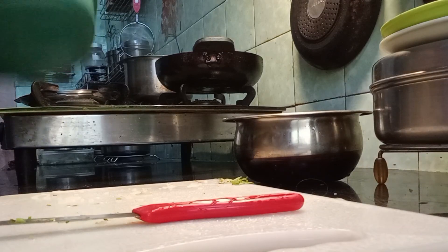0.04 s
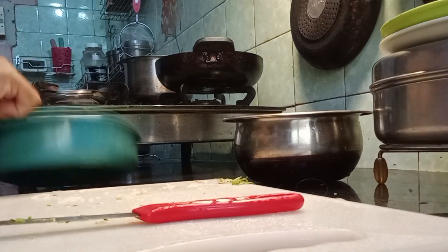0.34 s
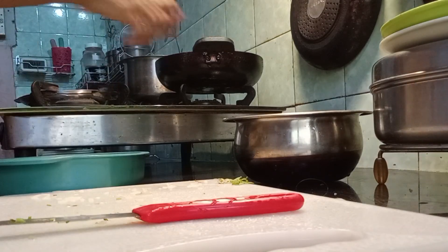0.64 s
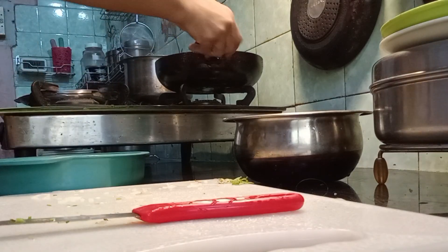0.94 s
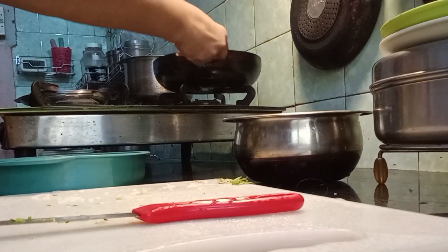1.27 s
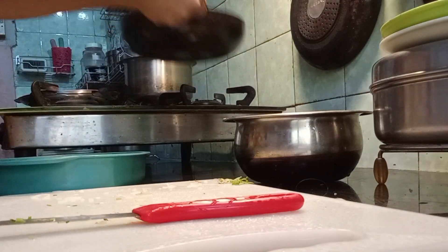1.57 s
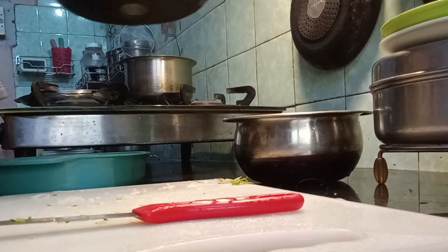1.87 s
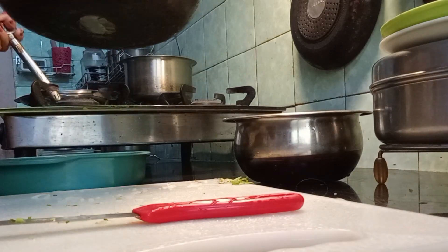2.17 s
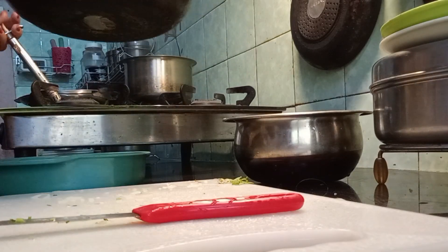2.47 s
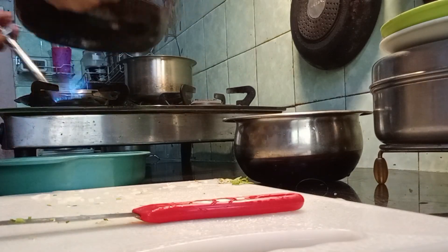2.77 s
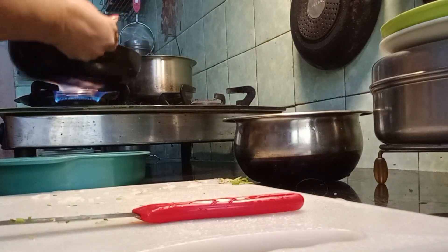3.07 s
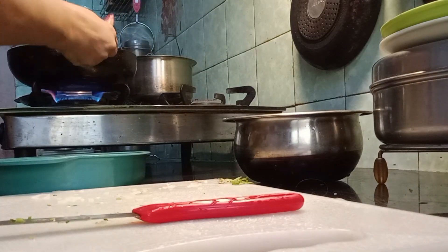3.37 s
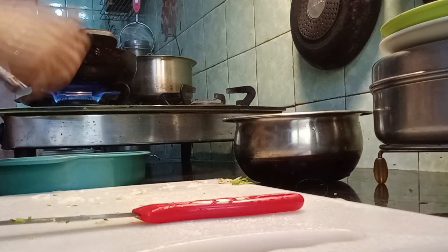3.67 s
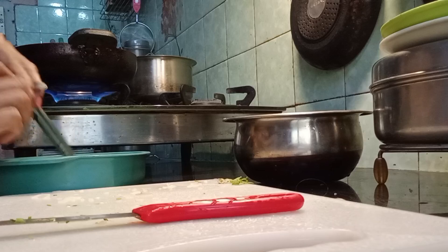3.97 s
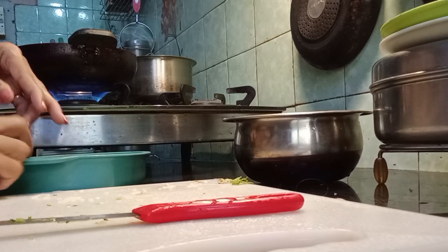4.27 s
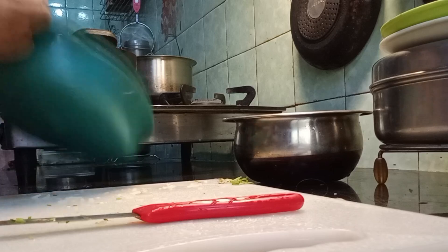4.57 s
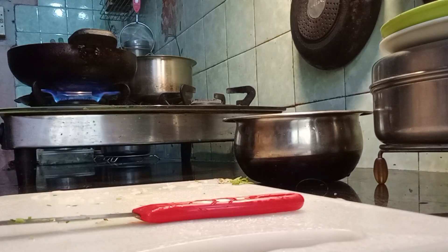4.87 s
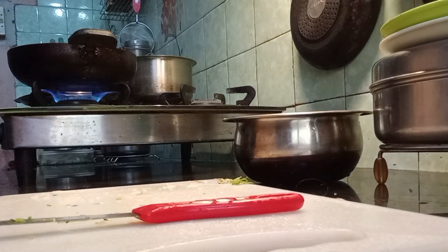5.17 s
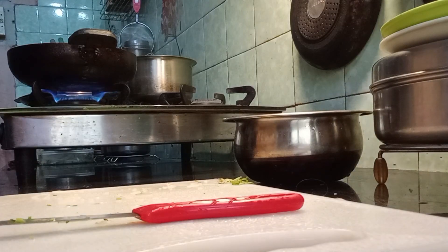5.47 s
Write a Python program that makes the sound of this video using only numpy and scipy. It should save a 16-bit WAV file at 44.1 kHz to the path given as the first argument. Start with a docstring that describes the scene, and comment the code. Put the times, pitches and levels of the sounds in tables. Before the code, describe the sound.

A hollow plastic basin knocks and slides on a stone counter, followed by a faint clink of a lifted pan. A gas knob clicks, a lighter snaps and the burner softly catches before the pan clanks onto the grate. A steel utensil drops noisily into the basin, which stutters away, and a cutting board is shoved. The microphone sits close on the worktop of a quiet tiled kitchen, picking up soft handling swishes.

```python
"""A small tiled kitchen, heard from the worktop. A plastic basin lands, slides and rocks on the stone.
A pan scrapes and clinks off the stove. The knob clicks, gas rushes out, a lighter snaps and the flame
catches with a soft whump; the pan knocks and squeals back onto the grate. A steel utensil clatters into
the basin, the basin is dragged away, and a board judders across the worktop close by. Each knock is a
thud, a ringing body and a tick; the moves swish and rumble over a quiet room tone."""
import sys
import numpy as np
from scipy import signal
from scipy.fft import rfft, irfft
from scipy.io import wavfile
from scipy.ndimage import uniform_filter1d

SR = 44100
rng = np.random.default_rng(int(sys.argv[2]) if len(sys.argv) > 2 else 0)


def wav_record(signal):
    """Record a signal, one row per channel, as 16-bit PCM in the file named by sys.argv[1]."""
    frames = np.transpose(np.atleast_2d(signal))
    bounded = np.clip(frames, -1, 1)
    # unit amplitude maps onto the largest positive 16-bit level
    quanta = np.round(bounded * 32767).astype(np.int16)
    wavfile.write(sys.argv[1], SR, quanta)


N = 252693

# Bright tick of a hard contact: f/Hz, level/dB
TICK_COLOUR = [(2710, -49), (4600, -17), (4670, -22), (5020, -11.5), (6110, -9), (6700, -0.5), (7090, 0),
               (8730, -5.5), (9230, -13), (10500, -0.5), (11500, -10), (12600, -6.5), (13800, -8.5),
               (14900, -10.5), (15500, -13)]
# Faint high hiss, peaking near 8 and 10 kHz: f/Hz, level/dB
HIGH_HISS_COLOUR = [(6000, -11), (7300, -5.5), (7800, 2), (8500, -7), (9300, -24), (10000, -1.5),
                    (10500, -4.5), (11200, -19.5)]
# Moves of an arm or a thing carried: t/s of top speed, half length/s, rumble level/dB, swish level/dB
ARM_MOVES = [(0.016, 0.031, -65, -41.5), (0.158, 0.05, -53, -41.5), (0.445, 0.11, -47.5, -43.5),
             (1, 0.089, -58.5, -75), (1.24, 0.051, -44.5, -65), (1.5, 0.18, -62, -71.5),
             (1.689, 0.024, -75, -48.5), (2.846, 0.042, -54, -75), (2.925, 0.054, -58, -61.5),
             (3.243, 0.07, -54, -51.5), (3.685, 0.052, -51.5, -64.5), (3.931, 0.098, -49, -58.5),
             (4.36, 0.067, -49, -58), (4.696, 0.062, -51, -50.5), (5.246, 0.094, -66, -66.5)]


def gain_of(db):
    """Decibels to amplitude."""
    return 10 ** (np.asarray(db) / 20)


def unit_rms(x):
    """Scales to rms 1."""
    return x / np.sqrt(np.mean(x ** 2) + 1e-20)


def unit_onset(x, size=1100):
    """Scales a sound so that its attack has rms 1."""
    return x / np.sqrt(np.mean(x[:size] ** 2) + 1e-20)


def curve_at(points, hz):
    """Reads a curve on a log-frequency axis."""
    f, value = np.transpose(points)
    return np.interp(np.log(hz + 1), np.log(f + 1), value)


def add(mix, s, sound):
    """Mixes a sound in at time s."""
    part = mix[max(round(s * SR), 0):][:len(sound)]
    part += sound[:len(part)]


def coloured(x, spectrum, size=4096):
    """Minimum-phase EQ that rolls off steeply beyond the ends of its spectrum."""
    hz = abs(np.fft.fftfreq(size, 1 / SR)) + 1
    octaves_outside = abs(np.log2(hz / np.clip(hz, spectrum[0][0], spectrum[-1][0])))
    log_gain = np.log(gain_of(np.maximum(curve_at(spectrum, hz) - 60 * octaves_outside, -100)))
    taps = np.fft.ifft(np.exp(np.conj(signal.hilbert(log_gain)))).real
    return signal.fftconvolve(x, taps[:size // 2])[:len(x)]


def drift(rate_hz):
    """Random modulation of rms 1, no faster than rate_hz."""
    slow = np.fft.rfftfreq(N, 1 / SR) < rate_hz
    return unit_rms(irfft(rfft(rng.standard_normal(N)) * slow, N))


def surge(crest_s, attack_s, release_s):
    """An envelope that swells to 1 at its crest and dies away."""
    t = np.arange(N) / SR - crest_s
    return np.exp(np.minimum(t / attack_s, -t / release_s))


def strokes(rows, attack_s=0.004, release_s=0.01):
    """The envelope of rubbing strokes: each builds up, holds to the end of its length and dies away."""
    t = np.arange(N) / SR
    return sum(gain_of(db) * np.clip((t - s) / attack_s, 0, 1)
               * np.exp(-np.maximum(t - s - length, 0) / release_s) for s, length, db in rows)


def swell(s, half_length_s):
    """A bell-shaped envelope, 1 at time s, like the speed of a smooth move."""
    return np.exp(-((np.arange(N) / SR - s) / half_length_s) ** 2 / 2)


def hiss(spectrum, grain_db, rate_hz, patchy_db):
    """Coloured noise whose level flutters and whose colour shifts in patches."""
    fluttering = rng.standard_normal(N) * gain_of(grain_db * drift(rate_hz))
    bands = signal.stft(fluttering, nperseg=1024, noverlap=768)[2]
    patches = uniform_filter1d(rng.standard_normal(bands.shape), size=4, axis=0)
    patches = unit_rms(uniform_filter1d(patches, size=14, axis=1))
    noise = signal.istft(bands * gain_of(patchy_db * patches), nperseg=1024, noverlap=768)[1][:N]
    return unit_rms(coloured(noise, spectrum))


def squeal(skids, pitch_hz, waver):
    """Stick and slip locks onto one unsteady pitch for as long as a skid lasts."""
    hz = pitch_hz * (1 + waver * drift(rate_hz=58))
    return np.sqrt(2) * strokes(skids) * np.sin(2 * np.pi * np.cumsum(hz) / SR)


def crack_and_tail(t, crack_db, damping, crack_s, late_db=-38, late_t60=0.31):
    """A short crack, then dense ringing and reflections off the tiles, each band at its own decay."""
    # Decay of the dense ringing before damping: f/Hz, t60/s
    ring_time = [(150, 0.32), (500, 0.21), (1400, 0.22), (3500, .18), (9000, 0.23), (15000, 0.11)]
    hz, s, bands = signal.stft(rng.standard_normal(len(t)), SR, nperseg=256)
    uneven = np.exp(.17 * rng.standard_normal((len(hz), 1)))
    ringing = gain_of(-60 * s * damping * uneven / curve_at(ring_time, hz)[:, None])
    reflections = gain_of(late_db - 60 * s / late_t60)
    tail = signal.istft(bands * (ringing + reflections) / uneven, SR, nperseg=256)[1][:len(t)]
    crack = rng.choice([-1., 1.], len(t)) * np.exp(-(t / crack_s) ** 3)
    crack[0] = 8  # the first contact stands above the chatter that follows
    return unit_rms(tail) + gain_of(crack_db) * unit_rms(crack)


def ring(t, modes, spot_db=1.0):
    """Decaying modes; their balance varies at random, as with the spot that is struck."""
    hz, db, t60 = np.transpose(modes)[:, :, None]
    share = gain_of(db + spot_db * rng.standard_normal(hz.shape)) * rng.choice([-1, 1], hz.shape)
    return (share * gain_of(-60 * t / t60) * np.sin(2 * np.pi * hz * t)).sum(0)


def struck(blows, modes, wash, tick_spectrum, level_db, modes_db, damping,
           rise_s=.0001, dulling=0.12, crack_s=0.003):
    """Each blow: a thud from its weight, clear modes over a wash of dense ones, and a contact tick.
    A blow's thud and tick are set against the body, its crack against the tail."""
    t, out = np.arange(SR // 2) / SR, np.zeros(N)
    split_hz, hard_tick_db = 470, -18
    lows = signal.butter(4, [85, split_hz], "band", fs=SR, output="sos")
    highs = signal.butter(4, split_hz, "high", fs=SR, output="sos")
    rise = 1 - np.exp(-(t + 1 / SR) / rise_s)  # glancing contacts build up slowly
    for s, db, thud_db, tick_db, crack_db in blows:
        dense = unit_onset(coloured(rise * crack_and_tail(t, crack_db, damping, crack_s), wash))
        ring_share = 1 / np.hypot(1, gain_of(crack_db))  # a sharp blow spends itself in the crack
        resonance = dense + ring_share * gain_of(modes_db) * unit_onset(rise * ring(t, modes))
        thud = gain_of(thud_db) * unit_onset(signal.sosfilt(lows, resonance))
        body = unit_onset(signal.sosfilt(highs, resonance))
        tilt_db = dulling * min(tick_db - hard_tick_db, 0)  # per octave: a weak tick is also a dull one
        colour = [(hz, level + tilt_db * np.log2(hz / tick_spectrum[0][0])) for hz, level in tick_spectrum]
        contact = rise * crack_and_tail(t, crack_db, damping, crack_s)
        tick = gain_of(tick_db) * unit_onset(coloured(contact, colour))
        add(out, s, gain_of(db + level_db) * (body + thud + tick))
    return out


def room_tone(whine_hz=1075, whine_db=-75):
    """A quiet bed of air with a thin, wavering whine."""
    # Colour of the still room: f/Hz, level/dB
    air_colour = [(30, -36), (100, -12.5), (180, -23.5), (260, -16.5), (400, -23), (850, -21.5),
                  (1070, -18.5), (1250, -25), (2000, -28.5), (2600, -35.5), (3700, -41), (4400, -51),
                  (16000, -51.5)]
    air = gain_of(-70.5) * hiss(air_colour, grain_db=1.7, rate_hz=6.1, patchy_db=4.5)
    hz = whine_hz * (1 + 0.0055 * drift(rate_hz=30))
    whine = gain_of(whine_db + 3.4 * drift(rate_hz=4.4)) * np.sin(2 * np.pi * np.cumsum(hz) / SR)
    return air + whine


def rumble(still_db=-75):
    """A low flutter that follows each move, with a few rounder puffs."""
    # Low end of handling and flame: f/Hz, level/dB
    rumble_colour = [(25, -25.5), (48, -17), (62, -9), (76, -17), (100, 9), (122, -8.5), (145, -2.5),
                     (185, -23), (300, -21)]
    # Soft puffs of flame and handling: t/s of the crest, level/dB, f/Hz, half length/s
    low_puffs = [(2.096, -41.5, 110.5, 0.012), (2.516, -38.5, 149, 0.055), (2.9, -49, 173.7, 0.012),
                 (2.97, -41.5, 126, 0.021), (3.164, -39.5, 129.6, 0.036), (3.934, -38.5, 140, 0.06)]
    wavering_t = np.cumsum(1 + 0.069 * drift(rate_hz=43)) / SR
    puffs = sum(gain_of(db) * swell(s, length) * np.sin(2 * np.pi * hz * wavering_t)
                for s, db, hz, length in low_puffs)
    motion = gain_of(still_db) + sum(gain_of(db) * swell(s, length) for s, length, db, _ in ARM_MOVES)
    return puffs + motion * hiss(rumble_colour, grain_db=3.0, rate_hz=14, patchy_db=-1.5)


def handling():
    """The hollow swish of things being moved, and the rustle of fingers."""
    # Colour of the swish: f/Hz, level/dB
    swish_colour = [(200, -13.5), (380, -3.5), (540, 3.5), (720, -6), (850, 1), (1080, -1.5), (1300, -19),
                    (1650, -15.5), (2000, -15), (2300, -31.5), (3800, -43.5), (5000, -58)]
    # Fingers rub on the basin and the pan's handle: t/s, length/s, level/dB
    finger_rubs = [(0.0, 0.025, -78.5), (0.97, 0.067, -80.5), (1.245, 0.036, -77.5), (3.84, 0.18, -85)]
    motion = sum(gain_of(db) * swell(s, length) for s, length, _, db in ARM_MOVES)
    swish = gain_of(-2) * motion * hiss(swish_colour, grain_db=1.5, rate_hz=46, patchy_db=3.5)
    rubbing = gain_of(-95) + strokes(finger_rubs, attack_s=0.013, release_s=0.04)
    return swish + rubbing * hiss(HIGH_HISS_COLOUR, grain_db=2.5, rate_hz=8.3, patchy_db=4.0)


def knob_and_lighter(spring_db=-48, spring_release_s=0.027):
    """The gas knob clicks round; the lighter snaps, and its spring rattles as the trigger is let go."""
    # Clicks of each mechanism: t/s, level/dB, thud/dB, tick/dB, crack/dB
    knob_clicks = [(2.2575, -24.5, -18, -12.5, -13), (2.34, -35, -3.5, -18, -20)]
    lighter_clicks = [(2.625, -20.5, -17.5, -0.5, -23), (2.819, -51, -17, 4.5, -24)]
    # Ring of both mechanisms: f/Hz, level/dB, t60/s
    modes = [(690, -2.5, 0.2), (1033, 1.5, 0.15), (1960, 0, 0.14), (2580, -6, 0.18), (3200, -9, 0.2)]
    # Colours of their dense ringing, the spark and the spring: f/Hz, level/dB
    wash = [(88, -44), (150, -12.5), (218, -17), (757, -1.5), (1420, -0.5), (1890, -1), (3170, -4),
            (4600, -22.5), (5980, -53)]
    spark_colour = [(2710, -47), (4600, -29), (5900, -15.5), (7830, -11.5), (9300, -13.5), (10700, -6.5),
                    (11300, -20), (12600, -12.5), (14300, -21.5), (15000, -6)]
    spring_colour = [(7400, -15), (8400, 3), (9300, -24), (10000, 6), (11000, -13), (13000, -7),
                     (15300, -12)]
    lighter = struck(lighter_clicks, modes, wash, spark_colour,
                     level_db=-10, modes_db=-11.5, damping=1.076, rise_s=0.00098)
    knob = struck(knob_clicks, modes, wash, TICK_COLOUR,
                  level_db=-11.5, modes_db=-8, damping=1.0, rise_s=0.001)
    t = np.arange(SR // 2) / SR
    rattle = unit_rms(coloured(rng.standard_normal(len(t)), spring_colour))
    add(lighter, lighter_clicks[-1][0], gain_of(spring_db) * rattle * np.exp(-t / spring_release_s))
    return knob + lighter


def burner(open_s=2.299, opening_s=0.034, spread_s=2.885, alight_s=3):
    """Gas rushes out and flutters until it is alight; the flame spreads round with a whump."""
    # Colours of the rushing gas, its low flutter and the spreading flame: f/Hz, level/dB
    gas_colour = [(88, -39.5), (150, -9.5), (237, -9.5), (588, -5.5), (711, -16.5), (1100, -6),
                  (1520, -28.5), (3250, -45), (4660, -84.5), (7920, -46), (14000, -89.5)]
    flutter_colour = [(25, -23.5), (45, -8.5), (62, 0.5), (80, -10.5), (105, 4), (145, -3), (190, -31.5),
                      (300, -15.5)]
    whump_colour = [(140, 5.5), (200, 2), (320, -2.5), (450, -14)]
    rush = gain_of(-33.5) * surge(open_s, opening_s, release_s=0.13)
    gas = rush * hiss(gas_colour, grain_db=1.0, rate_hz=41, patchy_db=1.44)
    valve_open = np.clip((np.arange(N) / SR - open_s) / opening_s + 3, 0, 1)
    build = gain_of(-48) * valve_open * surge(alight_s, attack_s=0.51, release_s=0.023)
    flutter = build * hiss(flutter_colour, grain_db=2.5, rate_hz=23, patchy_db=1.0)
    flare = gain_of(-39) * surge(spread_s, attack_s=0.0163, release_s=0.024)
    whump = flare * hiss(whump_colour, grain_db=3.0, rate_hz=52, patchy_db=5.0)
    return gas + flutter + whump


def board(start_s=5.591, slips_per_s=3000, judder_db=-24, grit_db=-62, low_cut_hz=170):
    """Light taps, then a board bumps, sticks and slips across the worktop."""
    # Taps and bumps: t/s, level/dB, thud/dB, tick/dB, crack/dB
    tap_blows = [(5.312, -41.5, -37.5, -30.5, -9), (5.384, -29, -25, -32.5, 2.5),
                 (5.488, -37.5, -8, -30, -17), (5.526, -42.5, -4, -25.5, -16)]
    bump_blows = [(5.593, -19, -12, -28, 2), (5.69, -20, -22, -58, -4), (5.701, -12.5, 9.5, -22.5, 5.5)]
    # Ring of the taps and of the board: f/Hz, level/dB, t60/s
    tap_modes = [(523, -8.5, 0.33), (695, -1, 0.21), (867, 17, 0.078), (930, -12.5, 0.1)]
    board_modes = [(267, -12, 0.057), (328.3, 7.5, 0.12), (394, -15, 0.033), (429.5, 0, 0.13),
                   (545, -1.5, 0.16)]
    # Their dense ringing: f/Hz, level/dB
    tap_wash = [(200, -2), (400, -26.5), (540, -14.5), (900, 1), (1250, -30), (1550, -14), (1750, -56),
                (2020, -18), (2300, -30), (2850, -21.5), (4000, -44)]
    board_wash = [(76, -11), (130, -22), (333, -5), (435, -11.5), (483, -17.5), (1130, -23), (1350, -28.5),
                  (2060, -31), (3410, -40.5), (4600, -63.5)]
    taps = struck(tap_blows, tap_modes, tap_wash, TICK_COLOUR,
                  level_db=-12, modes_db=2, damping=1.7, rise_s=0.0011)
    shove = struck(bump_blows, board_modes, board_wash, TICK_COLOUR,
                   level_db=-10.5, modes_db=12, damping=2.6, rise_s=0.00051, crack_s=0.009)
    t = np.arange(N - round(start_s * SR)) / SR
    slips = (rng.random(len(t)) < slips_per_s / SR) * rng.uniform(-0.59, 1, len(t))
    ringing = unit_rms(signal.fftconvolve(slips, ring(t, board_modes))[:len(t)])
    judder = unit_rms(unit_rms(coloured(slips, board_wash)) + 0.5 * ringing)
    grit = unit_rms(coloured(rng.standard_normal(len(t)) * rng.exponential(1, len(t)), HIGH_HISS_COLOUR))
    add(shove, start_s, gain_of(judder_db) * judder + gain_of(grit_db) * grit)
    return taps + signal.sosfilt(signal.butter(6, low_cut_hz, "high", fs=SR, output="sos"), shove)


def basin():
    """The plastic basin lands, slides, squeaks and rocks; later it stutters as it is pulled away."""
    # Knocks of the landing and the drag: t/s, level/dB, thud/dB, tick/dB, crack/dB
    landing_blows = [(0.323, -7, -12, -20.5, 2.5), (0.359, -19, -15.5, -33, -4.5),
                     (0.511, -9, -25.5, -29, 0.5), (0.534, -13.5, -17.5, -18.5, -2),
                     (0.545, -8, -13, -18.5, -3.5), (0.597, -19.5, -11, -35, -12),
                     (0.714, -49.5, -20, -7, -2)]
    drag_blows = [(4.581, -42.5, -30, -14, -24), (4.616, -21, -41, -26, -4),
                  (4.635, -21.5, -40, -23.5, -28), (4.665, -19.5, -28, -41, -10),
                  (4.701, -18.5, -26, -32.5, -1.5), (4.741, -27.5, -24, -32.5, 1.5)]
    # Ring of the plastic shell: f/Hz, level/dB, t60/s
    modes = [(165, 2, .2), (207, 4, .2), (335, -1, .18), (556, -1, .24), (705, -1, .17), (861, -1, .18),
             (990, -1, .2), (1250, -3, .18), (1543, 0, .22), (1830, -5, .2)]
    # Colours of the shell as it lands, is dragged and slides: f/Hz, level/dB
    landing_wash = [(90, -14.5), (170, 0), (240, -4), (335, 2.5), (400, -9.5), (560, -6.5), (740, 0),
                    (1000, -6), (1300, -9), (1560, -5.5), (1750, -9), (2200, -15), (3300, -19.5),
                    (4400, -38.5)]
    drag_wash = [(88, -59), (150, -40), (370, -31), (602, -13.5), (886, -7.5), (1300, -17), (1570, -9.5),
                 (1710, -22), (3170, -30), (4600, -56), (5980, -76)]
    slide_colour = [(300, -14.5), (570, -8), (720, -1.5), (920, 0), (1200, -10.5), (1550, -2.5),
                    (1900, -15), (3300, -21.5), (4400, -43.5)]
    # Its foot slides and squeaks on the stone: t/s, length/s, level/dB
    foot_slides = [(0.352, 0.026, -25.5), (0.378, 0.026, -35), (0.482, 0.037, -31.5), (4.484, 0.044, -42.5)]
    foot_squeaks = [(0.489, 0.012, -32)]
    landing = struck(landing_blows, modes, landing_wash, TICK_COLOUR,
                     level_db=-11, modes_db=-5, damping=1.047, crack_s=0.008)
    friction = hiss(slide_colour, grain_db=2.5, rate_hz=89, patchy_db=2.0)
    slides = strokes(foot_slides, attack_s=0.009, release_s=0.011) * friction
    squeak = squeal(foot_squeaks, pitch_hz=1250, waver=0.022)
    drag = struck(drag_blows, modes, drag_wash, TICK_COLOUR,
                  level_db=-7.5, modes_db=-16.5, damping=1.52, rise_s=0.0011, crack_s=0.006)
    return landing + slides + squeak + drag


def pan():
    """The pan scrapes and clinks against the grate on the way up, then skids and seats on it."""
    # Contacts going up and coming down: t/s, level/dB, thud/dB, tick/dB, crack/dB
    lifting_blows = [(1.437, -35.5, -16.5, -20.5, 4), (1.625, -44, -6, -8, -7)]
    seating_blows = [(3.178, -14, -21.5, -38, -9), (3.186, -15.5, -15.5, -22, -13),
                     (3.201, -14.5, -6, -27.5, -5.5), (3.236, -10.5, -17, -33.5, -19),
                     (3.243, -10, -14.5, -31, -3.5), (3.276, -22.5, -30, -26.5, 7.5)]
    # Ring of the pan: f/Hz, level/dB, t60/s
    modes = [(349, -4, .28), (463, -3, .22), (557, 0, .2), (610, -5, .2), (792, 3, .24), (850, -4, .24),
             (1034, -8, .24), (1340, -5, .22), (1625, -4, .2), (2240, -10, .18), (2700, -36, .45),
             (3138, -26, .34), (3820, -35, .36)]
    # Dense ringing of grate and pan: f/Hz, level/dB
    grate_wash = [(200, -26), (620, -5), (780, -23), (1070, 3), (1380, -2.5), (1550, 6.5), (2200, -4.5),
                  (3470, -10), (4300, -28)]
    pan_wash = [(47, -62), (80, -20), (316, -2), (344, 0.5), (429, -16), (543, -1.5), (713, -14), (789, 1),
                (935, -9.5), (1660, -10), (2040, -15), (3170, -23), (4600, -51.5)]
    # The base scrapes off the grate and skids back on: t/s, length/s, level/dB
    scrapes = [(1.414, 0.029, -46.5)]
    skids = [(3.180, 0.034, -23.5), (3.266, .01, -39)]
    scrape = strokes(scrapes) * hiss(grate_wash, grain_db=1, rate_hz=210, patchy_db=6.5)
    clinks = struck(lifting_blows, modes, grate_wash, TICK_COLOUR,
                    level_db=-12.5, modes_db=-15, damping=1.28, rise_s=0.0033)
    knocks = struck(seating_blows, modes, pan_wash, TICK_COLOUR,
                    level_db=-12.5, modes_db=-3.5, damping=1.14, dulling=0.3)
    return scrape + clinks + knocks + squeal(skids, pitch_hz=1618, waver=0.0036)


def utensil():
    """A steel utensil taps the basin, drops in and bounces to rest."""
    # Tap, drop and bounces: t/s, level/dB, thud/dB, tick/dB, crack/dB
    bounces = [(4.013, -15, -32.5, -28, 0.5), (4.152, -17.5, -10.5, -19, -4),
               (4.198, -25.5, 1.5, -27, -15.5), (4.2255, -9.5, -26.5, -20, 2.5), (4.25, -4, -31.5, -18, 7),
               (4.265, -6, -38, -19, 3.5), (4.271, -6.5, -25, -16.5, 2.5), (4.277, -9, -27, -25, 5.5),
               (4.298, -12.5, -12.5, -16, -11), (4.323, -19.5, -8, -15, -4), (4.361, -14.5, -32, -22, -1.5),
               (4.404, -23, -17, -20, -1)]
    # Ring of the clatter: f/Hz, level/dB, t60/s
    modes = [(345, -4, .3), (695, -2, .24), (978, -3, .17), (1181, -6, .2), (1373, -3, .22), (1413, -3, .2),
             (1483, 0, .15), (1557, 3, .2), (1705, -6, .18), (2107, -4, .22), (2430, -13, .18),
             (2998, -16, .22)]
    # Its dense ringing: f/Hz, level/dB
    wash = [(47, -42.5), (80, -10.5), (184, -21), (338, 0), (407, -12.5), (622, -9.5), (701, 0),
            (1030, -15), (1530, 0), (1780, -9.5), (2770, -15), (3170, -15.5), (4600, -41), (5980, -60.5)]
    return struck(bounces, modes, wash, TICK_COLOUR,
                  level_db=-11.5, modes_db=-3.5, damping=1.17, rise_s=0.001, crack_s=0.0064)


def scene():
    """The action over its background, in mono."""
    action = basin() + pan() + knob_and_lighter() + burner() + utensil() + board()
    return (action + rumble() + handling() + room_tone())[None]


def record(dry, notch_hz=4850, notch_q=6, ceiling=0.9, high_cut_hz=15500):
    """The microphone port notches the treble; a soft clip rounds the peaks; a high cut follows."""
    notched = signal.lfilter(*signal.iirnotch(notch_hz, notch_q, fs=SR), dry)
    rounded = notched / (1 + (notched / ceiling) ** 6) ** (1 / 6)
    high_cut = signal.firwin(511, high_cut_hz, window=("kaiser", 8), fs=SR)
    return signal.oaconvolve(rounded, high_cut[None], "same")


dry = scene()
out = record(dry)
wav_record(out)
```